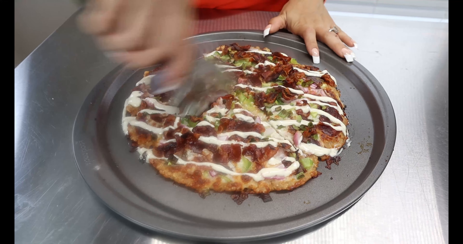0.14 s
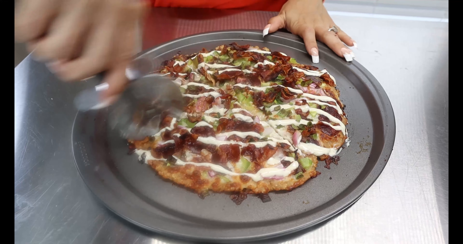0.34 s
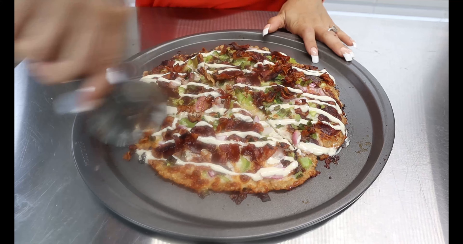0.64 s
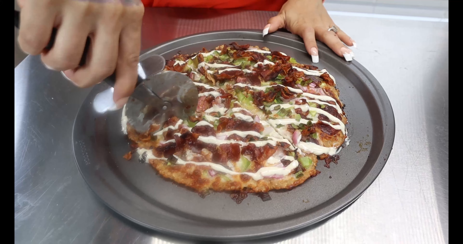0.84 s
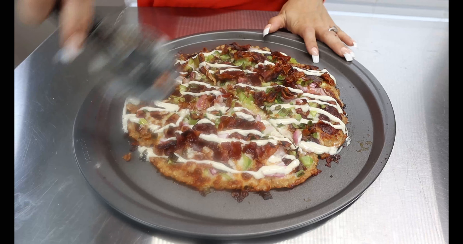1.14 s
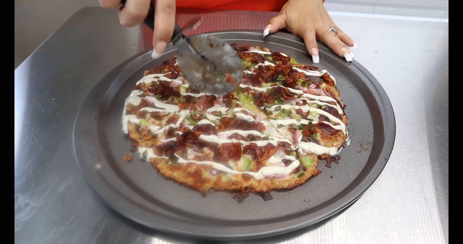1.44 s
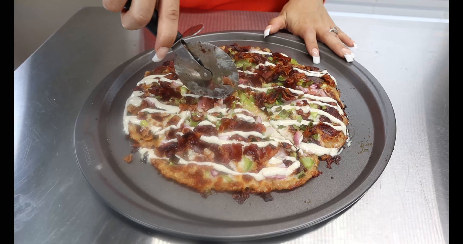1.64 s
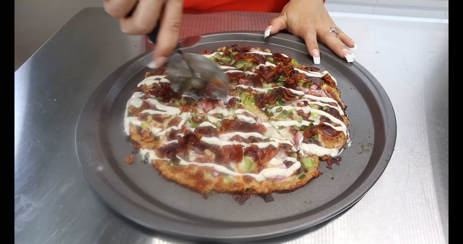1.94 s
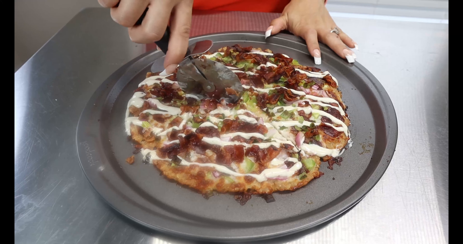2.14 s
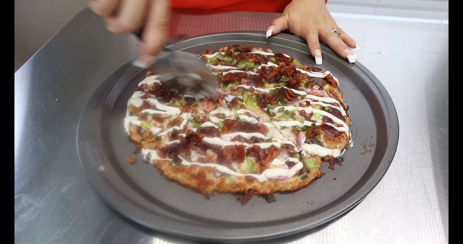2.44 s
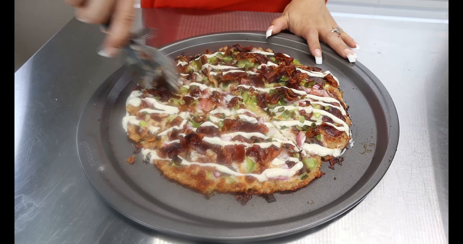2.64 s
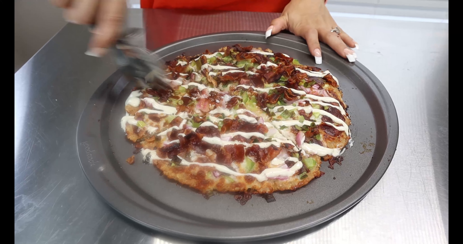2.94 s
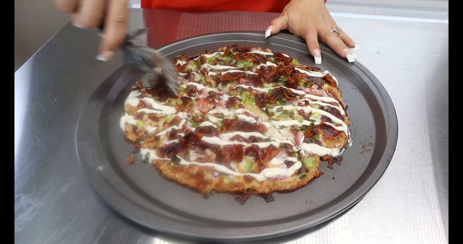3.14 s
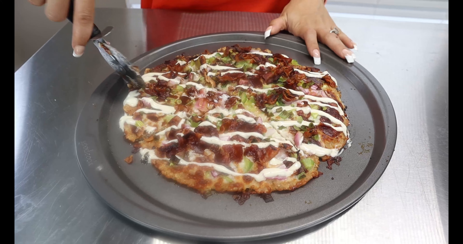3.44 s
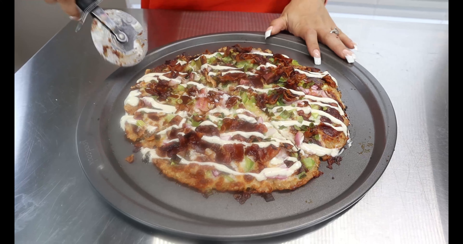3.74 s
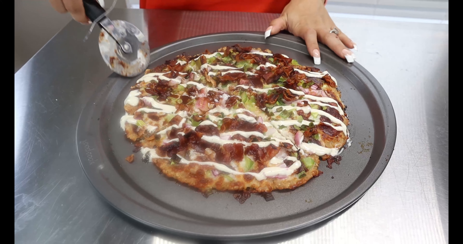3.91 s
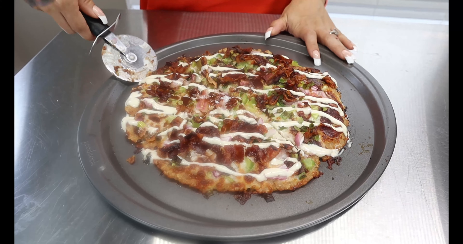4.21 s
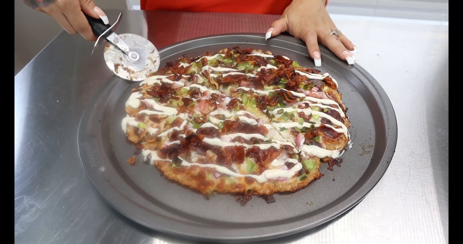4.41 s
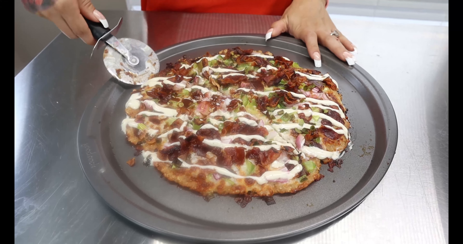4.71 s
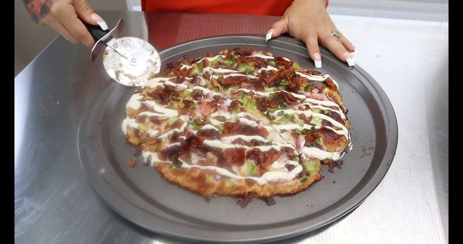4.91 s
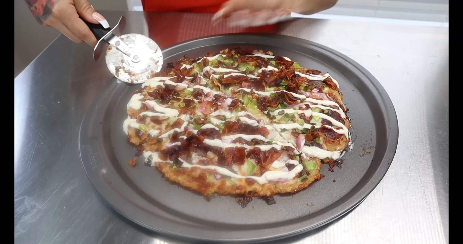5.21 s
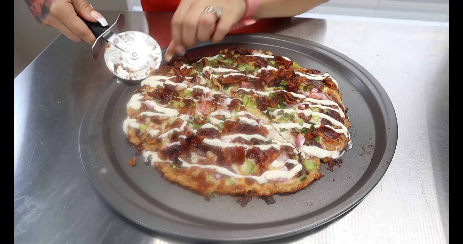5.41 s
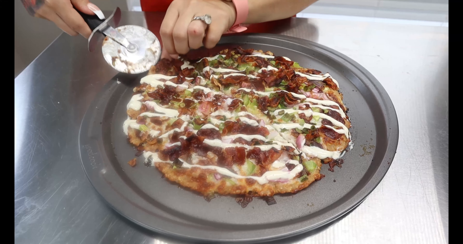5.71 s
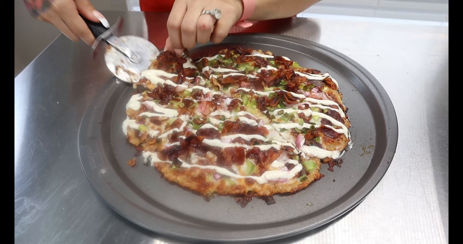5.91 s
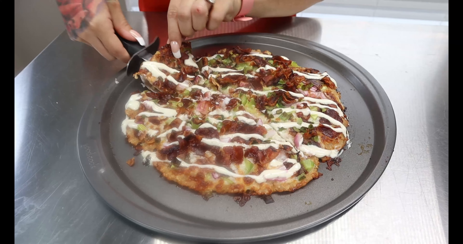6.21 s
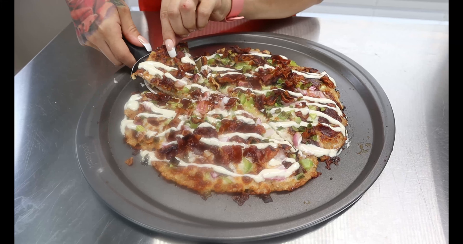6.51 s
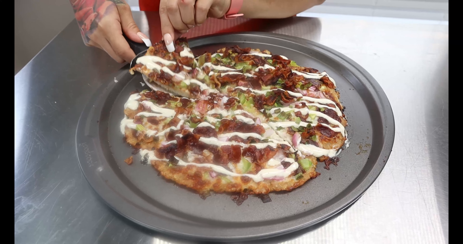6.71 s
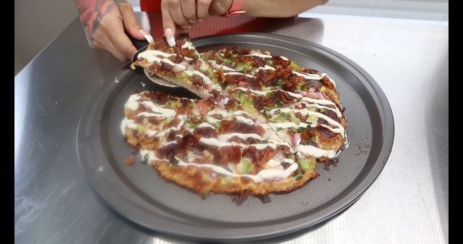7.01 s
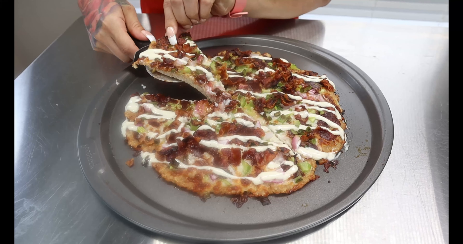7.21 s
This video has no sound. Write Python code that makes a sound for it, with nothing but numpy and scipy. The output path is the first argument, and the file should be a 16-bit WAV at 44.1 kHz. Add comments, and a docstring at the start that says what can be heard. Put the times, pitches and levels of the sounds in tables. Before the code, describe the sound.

Uneven crunching strokes of a cutting wheel through pizza, with metallic clicks and a ringing pan clank over a faint kitchen hum.

```python
"""Crisp pizza crust crunches as a steel cutting wheel rolls back and forth on a thin metal pan.
Uneven slips and cracks drive the crust; the loose wheel ticks and rings, later dragging on bare metal.
The pan clanks and drums on a steel counter. A small kitchen hums behind.
Gain control ducks after the loudest clank."""
import sys
import numpy as np
from scipy import signal
from scipy.io import wavfile
from scipy.ndimage import uniform_filter1d

SR = 44100
rng = np.random.default_rng(int(sys.argv[2]) if len(sys.argv) > 2 else 0)


def output_pcm(signal):
    """Save a mono or channel-first signal as 16-bit PCM at the path in sys.argv[1].

    Samples are clipped to [-1, 1] before scaling.
    """
    pcm = np.clip(np.atleast_2d(signal).T, -1, 1) * 32767
    wavfile.write(sys.argv[1], SR, np.round(pcm).astype(np.int16))


N = 324135

# Spectral shapes (frequency [Hz], relative density [dB])
AIR_SPECTRUM = [(12, -51), (20, -24), (70, 5.5), (181, -10.5), (274, 4), (362, 1.5), (416, -10.5),
                (668, -19), (727, -19), (3860, -23), (5250, -42.5), (8190, -48), (15600, -67.5)]
COUNTER_SPECTRUM = [(26, -38), (45, 3), (179, -1), (269, 6), (356, -1.5), (452, 1), (662, -2), (817, -5.5),
                    (995, -9), (1160, -14), (1300, -9), (1690, -35), (2860, -120)]
CRUST_SPECTRUM = [(300, -28), (650, -15.5), (1500, 2.5), (3000, -0.5), (4500, -5.5), (7000, -26),
                  (12000, -64)]
FIZZ_SPECTRUM = [(2500, -27.5), (4500, -2.5), (6000, 2.5), (9000, -3.5), (12500, -7.5), (15000, -6.5),
                 (17000, -19.5)]
# Appliance hum (time [s], level [dB])
HUM_LEVELS = [(0.0, -59), (1.25, -52.5), (1.601, -66.5), (2.198, -54), (3.4, -57), (4.4, -53), (5.2, -50.5),
              (5.7, -60.5), (7.35, -69.5)]
# Kitchen decay (frequency [Hz], t60 [s])
KITCHEN_DECAY = [(120, 1), (400, 1), (1000, .5), (3000, 0.43), (8000, 0.46), (11000, 0.16), (15000, 0.25)]
# Metal modes (frequency [Hz], relative level [dB], t60 [s])
PAN_MODES = [(684, -20, .3), (1230, -4, .035), (1362, -26, .4), (1680, -24, .5), (1938, -15, .55),
             (2100, -22, .55), (2331, -19, .6), (2455, -17, .6), (2560, -19, .55), (2705, -19, .55),
             (2826, -22, .5), (3030, -17, .5), (3128, -17, .55), (3250, -16, .5), (3400, -24, .55),
             (3725, -27, .4), (5055, -27, .5), (5180, -29, .5), (5647, -31, .45), (6250, -28, .55),
             (6415, -23, .55), (6950, -30, .55), (7214, -34, .55), (8145, -33, .5), (8300, -33, .5),
             (8750, -35, .5), (9600, -37, .35)]
WHEEL_MODES = [(1230, -1, .07), (1420, -3, .08), (1620, -5, .07), (1880, -7, .08), (2720, 0, .06),
               (3120, -7, .08), (3330, -8, .25), (3700, -3, .08), (4500, -9, .05), (5380, -3, .08),
               (7290, -11, .09), (7990, -5, .08), (9000, -12, .07), (9590, -13, .12), (11000, -11, .06),
               (11260, -17, .12), (12600, -11, .04), (14500, -11, .04), (15500, -15, .07)]
# Dense small pan modes (centre [Hz], width [Hz], relative level [dB], t60 [s])
PAN_SHIMMER = [(438, 520, -11.5, 0.39), (2380, 1400, -9, 0.91), (6390, 4000, -9, 0.17)]
# Knocks that ring the whole pan (time [s], level [dB])
PAN_CLANKS = [(1.0856, -18.5), (4.0464, -46.5)]
# Crust and cheese snaps (time [s], level [dB], pitch [Hz])
CRUST_SNAPS = [(0.0903, -25, 7240), (0.31, -41, 8300), (0.347, -38, 6140), (0.362, -36, 11000),
               (0.4484, -27, 5800), (0.4594, -37, 5350), (0.752, -23, 8340), (0.9872, -54, 6260),
               (1.158, -23, 12900), (1.196, -40, 12800), (1.308, -27.5, 11300), (1.322, -33, 12500),
               (1.589, -34, 6820), (1.643, -40.5, 8040), (1.754, -44.5, 5370), (2.2387, -39, 6170),
               (2.3113, -42, 6500), (2.4339, -43.5, 6680), (3.306, -43.5, 10000), (3.5404, -47, 7460),
               (3.6492, -31, 9700), (3.76, -49, 5300), (3.954, -38, 9500), (4.15, -31.5, 7340),
               (4.263, -38, 5100), (4.6987, -36, 5160), (4.883, -39, 8200), (4.9334, -42, 7580),
               (5.165, -17.5, 6200), (5.7904, -50.5, 7470), (6.19, -33, 12530), (6.3194, -27.5, 5730),
               (6.6902, -43.5, 12600), (6.9383, -49, 6880), (7.0124, -45, 6240), (7.0672, -43.5, 8030),
               (7.146, -43.5, 6960), (7.216, -49, 13000), (7.3044, -49.5, 14800)]
# Knocks and ticks (time [s], level [dB], treble [dB re level], thud [dB re level], contact t60 [s],
# clink [Hz], favoured high wheel pitch [Hz], wheel ring [dB re level])
WHEEL_KNOCKS = [(0.0508, -54, 3, 0, 0.011, 980, 7250, -35),
                (0.0807, -20, -12, -1.5, 0.036, 1730, 4910, -43),
                (0.2077, -45.5, -4, -3, 0.02, 1990, 7990, -29),
                (0.2382, -28.5, -7, -13, 0.0086, 1900, 5500, -54),
                (0.2667, -19.5, -30, -11, 0.0045, 1510, 4440, -13),
                (0.3934, -20.5, -10, 13, 0.0042, 1580, 5600, -42),
                (0.413, -17, -3, -8, 0.0082, 1930, 5840, -43),
                (0.494, -41, 6, -12, 0.0058, 1820, 11100, -33),
                (0.5735, -37.5, -5.5, -16, 0.014, 890, 5990, -34),
                (0.595, -34.5, -6.5, -9, 0.05, 2020, 5600, -40.5),
                (0.6848, -31.5, -15, -6, 0.014, 2480, 7000, -24),
                (0.7107, -22, -17, -19, 0.011, 1840, 7390, -31),
                (0.748, -27.5, -8, -8, 0.025, 1840, 8140, -32),
                (0.7721, -17.5, -11, -11, 0.025, 3274, 7230, -22),
                (0.7952, -24.5, -9, -11, 0.015, 3250, 4500, -30),
                (0.88, -46.5, 6.5, -10, 0.026, 2175, 5380, -24),
                (0.9156, -47.5, 7.5, -8, 0.014, 1170, 14100, -30),
                (1.058, -31, -15, -1, 0.005, 3250, 4400, -13),
                (1.0851, 4, -12, -17.5, 0.028, 2885, 6500, -23),
                (1.249, -58, 26, -22.5, 0.022, 4500, 11800, -20),
                (1.4717, -45.5, 7, 2, 0.015, 2520, 10900, -39),
                (1.56, -45.5, -2, -9, 0.011, 3160, 5460, -28.5),
                (1.589, -40.5, 14.5, -33.5, 0.033, 3600, 5050, -32.5),
                (1.8344, -35, 5, -25, 0.012, 2060, 8100, -48),
                (1.8983, -20, 3, -43, 0.0044, 3050, 6050, -40),
                (2.0063, -52, 15, -0.5, 0.0092, 1410, 5780, -43),
                (2.0422, -25.5, -17, 4.5, 0.029, 1014, 4600, -43),
                (2.0788, -29.5, -30, 2, 0.0061, 1480, 5450, -34),
                (2.192, -43, 6, -3, 0.011, 1096, 6350, -52.5),
                (2.3735, -40, 9.5, -9, 0.0033, 1330, 7320, -40),
                (2.3888, -33, -5, -8.5, 0.063, 1410, 8050, -29),
                (2.5176, -53.5, 2, -13.5, 0.015, 934, 13900, -34.5),
                (2.7145, -31.5, -25, 3, 0.015, 1110, 6600, -30),
                (2.7353, -37.5, 4.5, -21.5, 0.043, 2050, 11000, -26),
                (2.7806, -36, -16, -16.5, 0.026, 4070, 7370, -32),
                (2.8612, -48, 0, 4, 0.014, 1040, 7870, -47),
                (2.8915, -40, -2.5, -12, 0.015, 1120, 5120, -41.5),
                (3.0211, -40, -12.5, 2.5, 0.011, 1410, 5390, -28),
                (3.0424, -36, -8, -12, 0.013, 1110, 5670, -26),
                (3.2406, -37, -20.5, 7, 0.0067, 990, 4600, -31),
                (3.259, -52, 3.5, -9, 0.0074, 1456, 5060, -27.5),
                (3.3704, -51.5, 4, -4, 0.014, 1280, 5270, -27.5),
                (3.4047, -36, -6.5, -23, 0.036, 2470, 5250, -38),
                (3.5612, -18.5, -14.5, -18.5, 0.0075, 3340, 7340, -28.5),
                (3.6297, -28, -13, -27, 0.011, 4240, 10400, -10),
                (3.7285, -45.5, -2, -8, 0.057, 2450, 4450, -14),
                (3.8128, -38, -16, -5, 0.008, 2270, 5320, -30),
                (3.8256, -35, -6, -20, 0.022, 4440, 9000, -27.5),
                (3.863, -29, -5, -15, 0.014, 3460, 12500, -25),
                (3.8998, -29.5, -10, -22, 0.011, 4450, 4330, -21),
                (3.9191, -27.5, -8.5, -24, 0.0065, 2320, 13000, -18),
                (3.945, -40, -4.5, -22, 0.082, 1340, 4730, -17),
                (4.0463, -8.5, -14.5, -20.5, 0.018, 1744, 8400, -23.5),
                (4.052, -10, -8, -27.5, 0.014, 2000, 8400, -39),
                (4.095, -32.5, 4.5, -36, 0.018, 1700, 7900, -18),
                (4.1313, -22, -20, -29, 0.011, 2480, 5370, -20),
                (4.2087, -32, -10, -4, 0.0049, 2260, 4500, -31),
                (4.2512, -31, -21, -2, 0.032, 3270, 4700, -18),
                (4.3531, -35, -5.5, -32, 0.047, 3870, 6340, -18),
                (4.4664, -27.5, -29, -18, 0.0092, 3500, 5500, -34.5),
                (4.5464, -38, -10, -12.5, 0.0097, 2560, 9600, -25),
                (4.6583, -38.5, -5.5, -10, 0.0095, 1880, 5260, -28),
                (4.6772, -22.5, -26.5, -27.5, 0.0071, 3000, 5250, -25),
                (4.8103, -35.5, -11, -22, 0.034, 3630, 5220, -29),
                (4.837, -39, -14, -18, 0.026, 1810, 5150, -33),
                (4.8674, -36, -14, -10, 0.032, 3570, 5200, -36),
                (4.9868, -12, -22.5, -36, 0.0043, 3150, 5070, -40),
                (5.0663, -31.5, -7, -31, 0.016, 2240, 6000, -38),
                (5.1601, -18, -26, -13, 0.01, 2550, 6080, -30),
                (5.1735, -8, -17.5, -6.5, 0.0085, 2850, 6200, -33),
                (5.2477, -32, -28, 3, 0.011, 2220, 4930, -35),
                (5.6108, -40.5, -14, -6, 0.014, 3045, 4660, -29),
                (5.814, -33.5, 0.5, -15, 0.0081, 3950, 7990, -41),
                (5.8825, -22, -3, -45.5, 0.01, 3180, 5000, -40),
                (6.0569, -24.5, -15, -9, 0.0074, 2840, 5900, -16.5),
                (6.0759, -23, -20, -25, 0.018, 3580, 5130, -30),
                (6.2686, -29, -15, -21, 0.012, 2840, 4500, -12),
                (6.3034, -15.5, -11, -35, 0.0062, 3140, 4510, -39),
                (6.7168, -35.5, 2, -13.5, 0.012, 3600, 12900, -34.5),
                (6.7985, -41.5, -14, -6.5, 0.017, 2500, 4650, -21),
                (7.1398, -44.5, 2, -7.5, 0.014, 3400, 5580, -42.5),
                (7.1653, -14, -24, -7, 0.0087, 2330, 4840, -35)]
# Strokes (peak time [s], rub [dB], rise [s], hold [s], fall [s], crisp treble [dB re rub],
# counter drumming [dB re rub], crust resonance [Hz])
WHEEL_STROKES = [(0.046, -49.5, .03, .055, 0.018, 4.5, 10, 1192),
                 (0.067, -41.5, 0.017, 0.015, 0.082, -15, 7.5, 1150),
                 (0.278, -43, 0.057, 0.0012, 0.076, -19, 14.5, 790),
                 (0.391, -37.5, 0.01, 0.035, 0.079, -3, 4.5, 1140),
                 (0.6, -48, 0.083, .002, 0.055, -19, 10.5, 930),
                 (0.697, -45.5, .005, 0.048, .03, -20, 5, 1900),
                 (0.772, -41, 0.064, .002, .06, -3.5, 3.5, 2880), (0.9, -60.5, .08, .03, .09, -9, 10, 1100),
                 (1.073, -50.5, 0.088, 0.0031, .005, -4, 9, 1900),
                 (1.589, -45.5, 0.017, .02, 0.017, -2.5, -17.5, 3490),
                 (1.77, -64, .065, 0.0018, .06, -15.5, 0.5, 870),
                 (1.845, -58.5, .05, 0.0016, .05, -6.5, -2.5, 1990),
                 (1.894, -43, 0.003, 0.0018, 0.068, -3, 4, 2880),
                 (2.053, -47, 0.04, .002, .15, -13.5, 7, 820), (2.241, -63.5, .1, 0.023, .04, -10, 7, 780),
                 (2.407, -52.5, 0.13, .002, .055, 0, 13.5, 1320),
                 (2.568, -57.5, .1, .002, .085, -3.5, 15.5, 757),
                 (2.691, -50, 0.021, 0.069, .13, -1, 9, 710),
                 (2.906, -56, 0.047, .002, 0.091, -5, 19.5, 685),
                 (3.027, -47.5, 0.016, 0.047, 0.055, -7, 7.5, 760),
                 (3.24, -53.5, 0.089, .002, 0.066, -4, 9, 916),
                 (3.412, -54.5, 0.12, .002, 0.073, -2, 9.5, 1945),
                 (3.565, -39.5, 0.0061, .002, 0.028, -28.5, 2.5, 2820),
                 (3.64, -53, 0.07, .002, .17, -6, -6, 2490), (3.85, -58, 0.11, 0.053, 0.25, -11, -11, 2700),
                 (4.057, -25.5, 0.006, 0.011, 0.01, -20, -22, 1892),
                 (4.065, -36, 0.0061, 0.063, .05, -8.5, -14.5, 1885),
                 (4.201, -53.5, .05, 0.15, 0.1, -11.5, -5, 2100),
                 (4.473, -41, .02, 0.016, .02, -10.5, -30, 3550),
                 (4.592, -56.5, 0.088, .002, .03, -10, -9.5, 1220),
                 (4.68, -43.5, 0.031, .002, 0.075, -12.5, 5.5, 2130),
                 (4.816, -50, 0.027, .002, .08, -9, -15, 2660),
                 (4.881, -53, 0.027, .002, .13, -10, -5, 2260),
                 (4.986, -35.5, 0.0017, 0.0014, .022, -16, -9, 2880),
                 (5.074, -59.5, 0.088, 0.12, .02, -10, 3, 2100),
                 (5.182, -30, .005, 0.0017, 0.0318, -17, 3, 730),
                 (5.205, -44.5, 0.033, .002, .2, -16, 9.5, 1520),
                 (5.642, -60, 0.098, 0.055, .1, -10, -1, 1100),
                 (5.82, -60.5, 0.17, 0.021, 0.0202, -11, -1.5, 1250),
                 (5.874, -44.5, .008, .002, 0.064, -2.5, -12, 2500),
                 (6.064, -34, .004, 0.11, .04, -2, -33, 1650),
                 (6.269, -43, 0.013, 0.001, 0.019, -16, -25.5, 3140),
                 (6.307, -37, 0.0024, .045, 0.025, -7, -31, 2200),
                 (6.418, -44, 0.15, 0.0018, .11, -14.5, -9, 1500),
                 (6.55, -59.5, 0.11, 0.032, .1, -17, 2, 1250), (6.799, -58.5, .08, 0.058, .06, -7, 3, 2460),
                 (7.166, -51, .005, 0.0025, 0.14, -15, 4.5, 1320)]


def gain_of(db):
    """Decibels to amplitude."""
    return 10 ** (np.asarray(db) / 20)


def unit_rms(x):
    """Scale to rms 1."""
    return x / np.sqrt(np.mean(x ** 2) + 1e-20)


def lookup(points, hz):
    """Interpolate a table over log frequency."""
    table_hz, value = np.transpose(points)
    return np.interp(np.log(hz + 1), np.log(table_hz + 1), value)


def add(mix, start_s, sound):
    """Mix a sound in at start_s."""
    part = mix[..., round(start_s * SR):][..., :sound.shape[-1]]
    part += sound[..., :part.shape[-1]]


def colour(x, spectrum, size=4096):
    """Minimum-phase filter of unit energy."""
    db = np.maximum(lookup(spectrum, abs(np.fft.fftfreq(size, 1 / SR))), -100)
    log_response = np.conj(signal.hilbert(np.log(gain_of(db))))
    response = np.fft.ifft(np.exp(log_response)).real[:size // 2]
    return signal.oaconvolve(x, response / np.linalg.norm(response))[:N]


def resonate(x, hz, width_hz):
    """Two resonances in series: each shifts hz to zero, smooths, shifts back."""
    carrier = np.exp(2j * np.pi * np.cumsum(hz * np.ones(len(x))) / SR)
    pole = np.exp(-np.pi * width_hz / SR)
    for _ in range(2):
        x = 2 * (carrier * signal.lfilter([1 - pole], [1, -pole], x / carrier + 1e-18)).real
    return x


def damped_sines(modes, length_s):
    """One decaying mode per row."""
    hz, db, t60_s = np.transpose(modes)[:, :, None]
    t = np.arange(round(length_s * SR)) / SR
    return gain_of(db - 60 * t / t60_s) * np.sin(2 * np.pi * hz * t)


def waver(shape, span_samples):
    """Slow complex noise: drift of level and phase."""
    noise = rng.standard_normal((2, *shape))
    real, imag = uniform_filter1d(uniform_filter1d(noise, span_samples), span_samples)
    return unit_rms(real) + 1j * unit_rms(imag)


def impulses(rate_per_s, spread_db):
    """Randomly timed impulses of uneven size."""
    size = gain_of(spread_db * np.minimum(rng.exponential(1, N), 3))
    return size * (rng.random(N) < rate_per_s / SR)


def kitchen_air(level_db=-52, drift_db=2.7):
    """Low room noise with drifting spectral patches."""
    hz = np.fft.rfftfreq(1024, 1 / SR)
    real, imag, patches = rng.standard_normal((N // 256 + 5, len(hz), 3)).T
    patches = unit_rms(uniform_filter1d(uniform_filter1d(patches, 8, 0), 14, 1))
    gain = gain_of(lookup(AIR_SPECTRUM, hz)[:, None] + drift_db * patches)
    air = signal.istft((real + 1j * imag) * gain, nperseg=1024, noverlap=768)[1]
    return gain_of(level_db) * unit_rms(air[:N])


def appliance_hum(hz=130):
    """One fuzzy, wavering tone."""
    t = np.arange(N) / SR
    level_db = np.interp(t, *np.transpose(HUM_LEVELS))
    hum = ((2.5 + waver([N], 1500)) * np.exp(2j * np.pi * hz * t)).real
    return gain_of(level_db) * unit_rms(hum)


def kitchen_reverb(x, level_db=-15):
    """Sparse reflections of random sign; each band decays at its own rate."""
    taps = np.zeros(SR)
    slots = np.arange(200, SR - 20, 20)
    taps[slots + rng.integers(0, 20, len(slots))] = rng.choice([-1., 1.], len(slots))
    hz, t, bands = signal.stft(taps, SR, nperseg=256)
    decay = gain_of(-60 * t / lookup(KITCHEN_DECAY, hz)[:, None])
    tail = signal.istft(bands * decay, SR, nperseg=256)[1]
    return gain_of(level_db) * signal.fftconvolve(x, tail / np.linalg.norm(tail))[:N]


def counter_boom(thuds, gain_db=1, t60_s=.28):
    """The steel counter drums on after a thud."""
    t = np.arange(SR // 2) / SR
    boom = rng.standard_normal(len(t)) * gain_of(-60 * t / t60_s)
    return gain_of(gain_db) * signal.fftconvolve(thuds, boom / np.linalg.norm(boom))[:N]


def pan_clanks():
    """Thin plate: each mode is a dense cluster, so it wavers; small modes fill the gaps."""
    modes = damped_sines(PAN_MODES, length_s=.9)
    ring = ((.8 + waver(modes.shape, 300)) * signal.hilbert(modes)).real.sum(0)
    ring /= np.std(ring[:2000])
    t = np.arange(len(ring)) / SR
    for hz, width_hz, db, t60_s in PAN_SHIMMER:
        shimmer = resonate(rng.standard_normal(len(t)), hz, width_hz)
        ring += gain_of(db - 60 * t / t60_s) * unit_rms(shimmer)
    out = np.zeros(N)
    for start_s, db in PAN_CLANKS:
        add(out, start_s, gain_of(db) * ring * np.sqrt(1 - t / t[-1]))
    return out


def crust_snaps(faint_count=110, faint_db=-57.5, spread_db=11, low_hz=6000, high_hz=15000, t60_s=.004):
    """Crust and cheese snap in brief pitched puffs; faint extras fall at random."""
    out, t = np.zeros(N), np.arange(300) / SR
    when, size, pitch = rng.random((faint_count, 3)).T
    faint = zip(when * N / SR, faint_db + spread_db * size, low_hz * (high_hz / low_hz) ** pitch)
    for start_s, db, hz in [*CRUST_SNAPS, *faint]:
        puff = rng.standard_normal(len(t)) * gain_of(-60 * t / t60_s)
        puff = .3 * puff + resonate(puff, hz, width_hz=4000)
        add(out, start_s, gain_of(db) * puff / abs(puff).max())
    return colour(out, FIZZ_SPECTRUM)


def wheel_knocks(reach_log_hz=.089, uneven_db=-4.5, clink_db=-11, clink_t60_ratio=3.9):
    """Contact chatter (rows: counter, crust, fizz) and metal: a dead clink plus wheel ring."""
    contact, metal = np.zeros((3, N)), np.zeros(N)
    t = np.arange(1500) / SR
    modes, mode_hz = damped_sines(WHEEL_MODES, length_s=.2), np.transpose(WHEEL_MODES)[0]
    for start_s, db, treble_db, thud_db, t60_s, clink_hz, high_hz, ring_db in WHEEL_KNOCKS:
        fall_db = 60 * t / t60_s
        noise = rng.standard_normal(len(t))
        chatter = np.sign(noise) * np.sqrt(abs(noise)) * gain_of(db - fall_db)
        body = resonate(chatter, clink_hz, width_hz=2100)
        add(contact, start_s, np.array([gain_of(thud_db) * chatter, body, gain_of(treble_db) * chatter]))
        clink = np.sin(2 * np.pi * clink_hz * t)
        add(metal, start_s, gain_of(db + clink_db - fall_db / clink_t60_ratio) * clink)
        # The struck spot favours modes near two pitches.
        low, high = np.exp(-.5 * (np.log(mode_hz / [[clink_hz], [high_hz]]) / reach_log_hz) ** 2)
        low += .19 * (mode_hz < clink_hz)
        high += .13 * (mode_hz > clink_hz)
        share = low + gain_of(treble_db + 22.5) * high
        mode_db = db + ring_db + uneven_db * rng.standard_normal(len(modes))
        add(metal, start_s, gain_of(mode_db) * share @ modes)
    return contact, metal


def stroke_pressure(slope_db=20, crisp_slope_db=19, rest_hz=760):
    """Strokes rise, hold, fall and add in power; the loudest dominates the crust pitch."""
    t = np.arange(N) / SR
    rest_db = [[-70.5], [-78], [-55]]
    rub, crisp, drum = gain_of(rest_db) ** 2 * np.ones(N)
    log_pitch = rub * np.log(rest_hz)
    for peak_s, db, rise_s, hold_s, fall_s, crisp_db, drum_db, hz in WHEEL_STROKES:
        span = slice(max(round((peak_s - 1) * SR), 0), round((peak_s + 1) * SR))
        age_s = t[span] - peak_s
        away = np.maximum(-age_s / rise_s, 0) + np.maximum((age_s - hold_s) / fall_s, 0)
        power = gain_of(db - slope_db * away) ** 2
        rub[span] += power
        crisp[span] += gain_of(db + crisp_db - crisp_slope_db * away) ** 2
        drum[span] += gain_of(drum_db) ** 2 * power
        log_pitch[span] += np.log(hz) * power
    return np.sqrt(rub), np.sqrt(crisp / rub), np.sqrt(drum / rub), np.exp(log_pitch / rub)


def wheel_ring(low_drive, high_drive, split_hz=4000, t60_ratio=.35):
    """Rubbing rings the wheel; pressure on the metal damps it."""
    modes = damped_sines(np.multiply(WHEEL_MODES, [1, 1, t60_ratio]), length_s=.2)
    is_high = np.transpose(WHEEL_MODES)[0] > split_hz
    out = np.zeros(N)
    for drive, band in (low_drive, ~is_high), (high_drive, is_high):
        response = modes[band].sum(0)
        out += signal.oaconvolve(drive, response / np.linalg.norm(response))[:N]
    return out


def wheel_strokes(hollow_db=-11.5, on_metal_s=3.55, ring_knee_db=-45.5):
    """Slips and cracks over a fine rub: drives (rows: counter, crust, fizz) and wheel ring."""
    rub, crisp_ratio, drum_ratio, crust_hz = stroke_pressure()
    slip_sizes = impulses(rate_per_s=1500, spread_db=3.5)
    direction, fine_rub, rumble = rng.standard_normal((3, N))
    slips = unit_rms(unit_rms(slip_sizes * np.sign(direction)) + .87 * fine_rub)
    hollow = resonate(slips, crust_hz, width_hz=1500)
    crust = unit_rms(slips + gain_of(hollow_db) * unit_rms(hollow))
    drum = unit_rms(.5 * slips + rumble)  # the heavy counter evens out the slips
    cracks = impulses(rate_per_s=250, spread_db=4)
    puffs = signal.lfilter([1], [1, -.96], cracks) * rng.standard_normal(N)
    fizz = unit_rms(slips + .51 * unit_rms(puffs))
    bare_db = np.where(np.arange(N) / SR < on_metal_s, -17.5, -2)  # in dough, then on metal
    bare = gain_of(bare_db) * rub / np.hypot(rub, gain_of(ring_knee_db))
    soft = np.sqrt(1 - bare ** 2)  # the crust loses what the bare wheel takes
    drives = rub * [drum_ratio * drum, soft * crust, soft ** 1.5 * crisp_ratio * fizz]
    scrape = rub * bare * slips
    return drives, wheel_ring(scrape, .7 * crisp_ratio * scrape)


def scene():
    """Rubbing and knocks sound through counter, crust and wheel, then the room."""
    rubbing, rub_ring = wheel_strokes()
    contact, knock_ring = wheel_knocks()
    counter, crust, fizz = rubbing + contact
    direct = colour(counter + counter_boom(contact[0]), COUNTER_SPECTRUM)
    direct += colour(crust, CRUST_SPECTRUM) + colour(fizz, FIZZ_SPECTRUM)
    direct += rub_ring + knock_ring + pan_clanks() + crust_snaps()
    return (direct + kitchen_reverb(direct) + kitchen_air() + appliance_hum())[None]


def record(dry, threshold_db=-7, peak_decay_db_per_s=92, cutoff_hz=15650):
    """Gain control clamps a few ms after a loud peak and recovers; soft clip; low-pass."""
    power_db = 10 * np.log10(signal.lfilter(np.ones(100) / 100, 1, dry[0] ** 2) + 1e-12)
    decay_db = np.arange(N) * peak_decay_db_per_s / SR
    peak_db = np.maximum.accumulate(power_db + decay_db) - decay_db
    over_db = np.maximum(peak_db - threshold_db, 0)
    duck_db = 1.1 * signal.lfilter(np.ones(200) / 200, 1, over_db)
    clipped = np.tanh(dry / gain_of(duck_db))
    lowpass = signal.firwin(511, cutoff_hz, window=("kaiser", 9), fs=SR)
    return signal.oaconvolve(clipped, lowpass[None], "same")


dry = scene()
out = record(dry)
output_pcm(out)
```